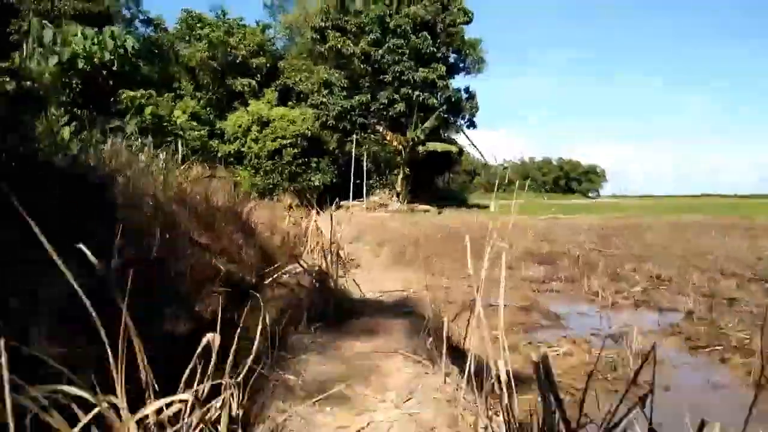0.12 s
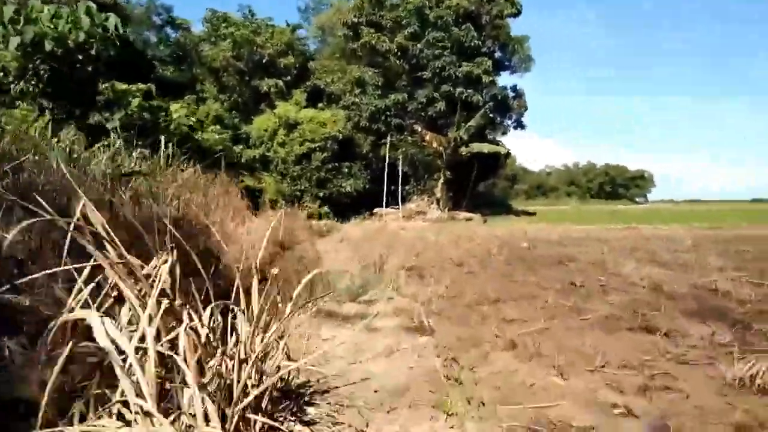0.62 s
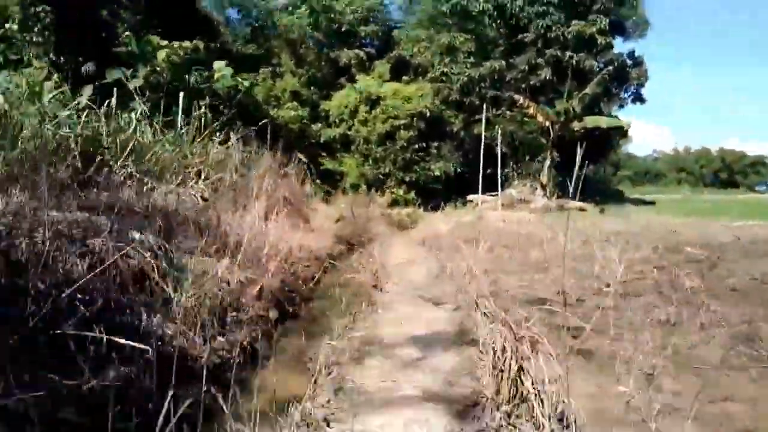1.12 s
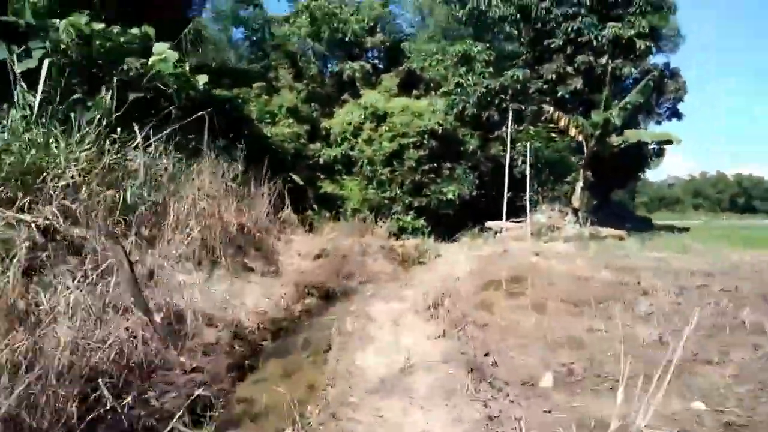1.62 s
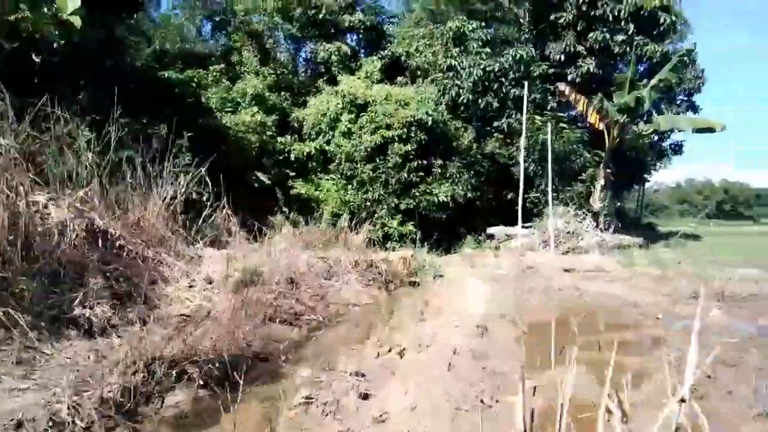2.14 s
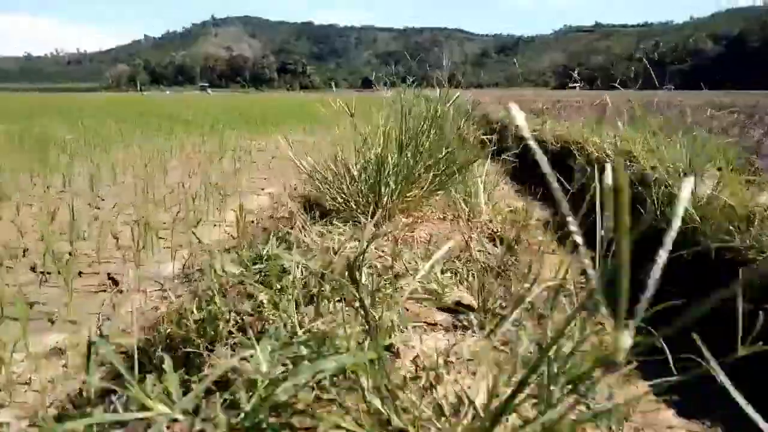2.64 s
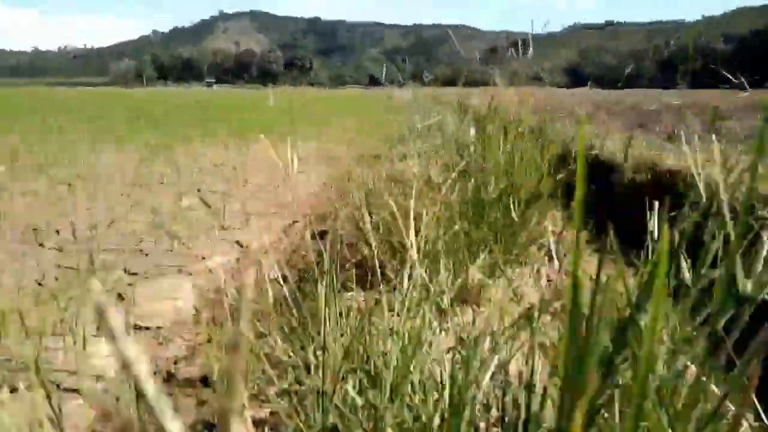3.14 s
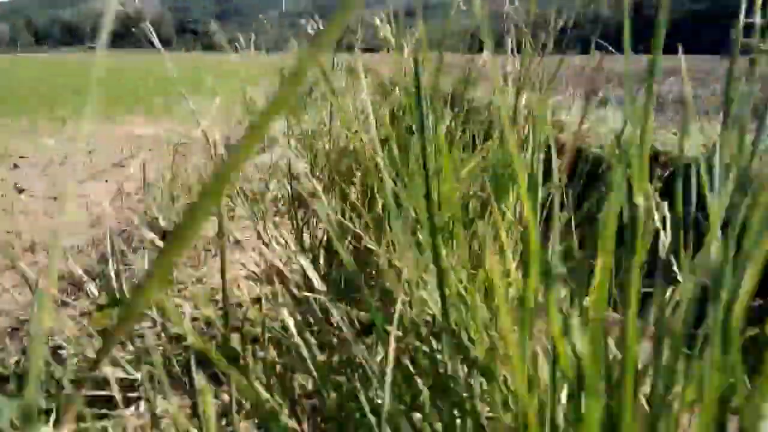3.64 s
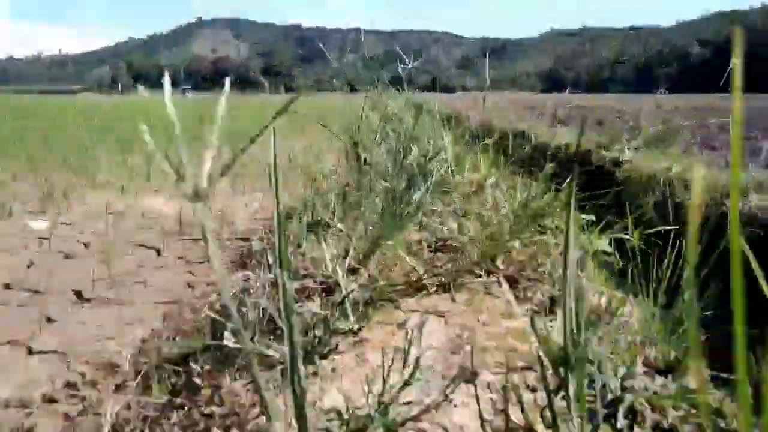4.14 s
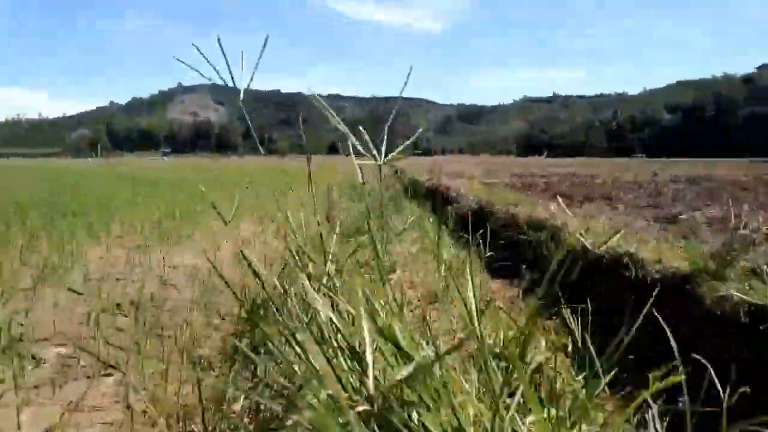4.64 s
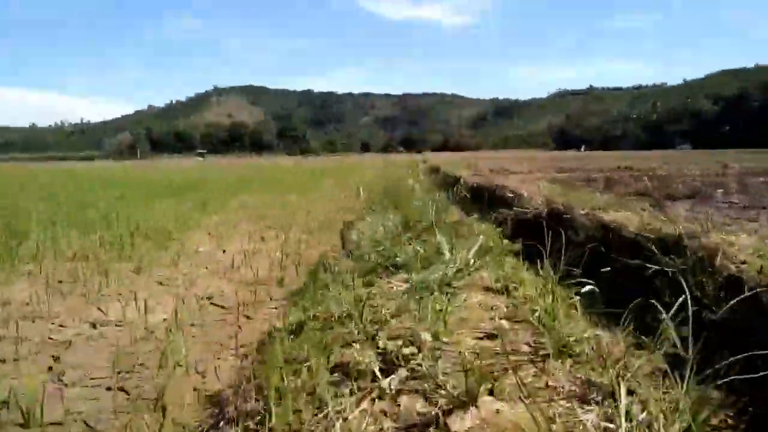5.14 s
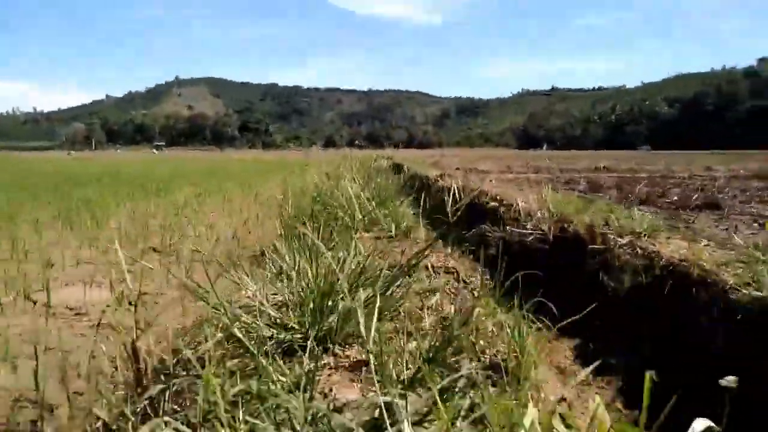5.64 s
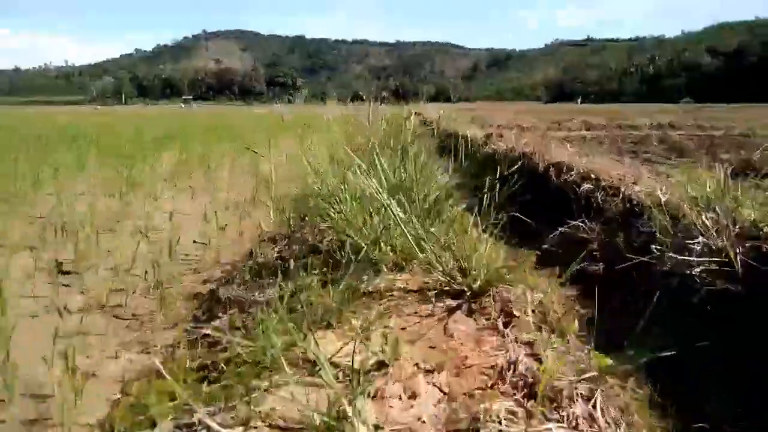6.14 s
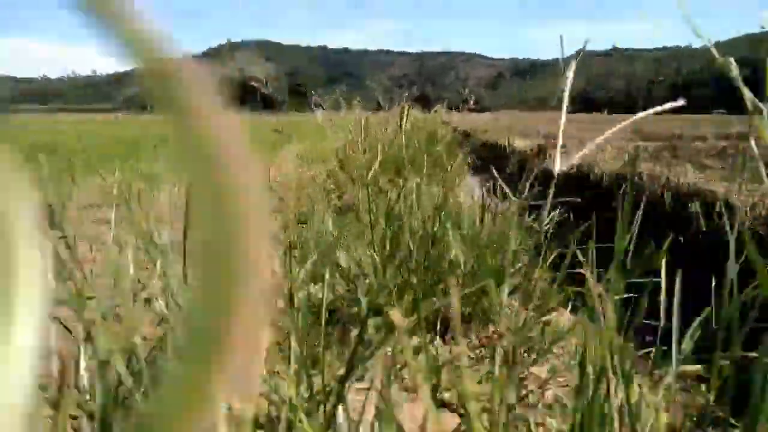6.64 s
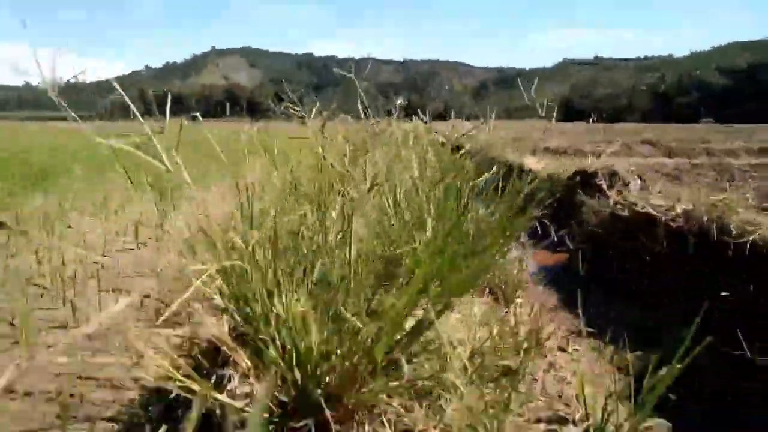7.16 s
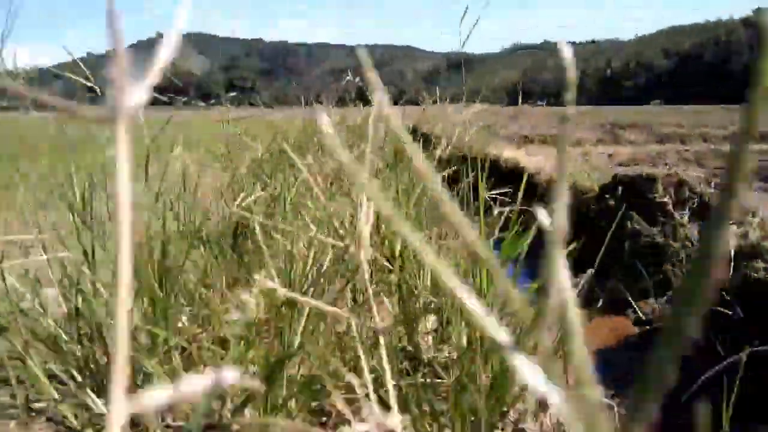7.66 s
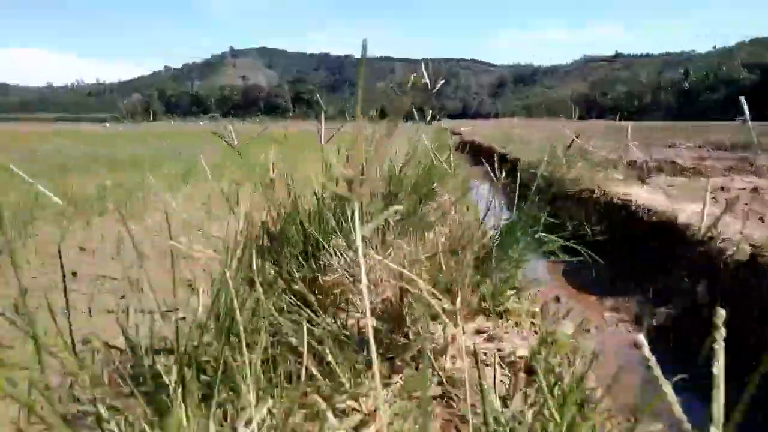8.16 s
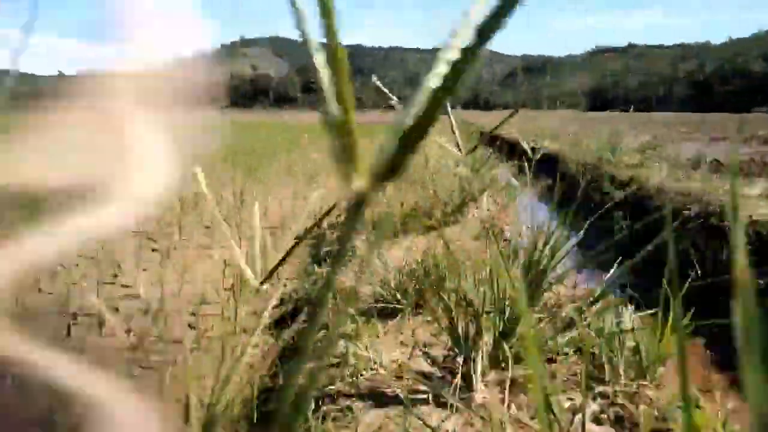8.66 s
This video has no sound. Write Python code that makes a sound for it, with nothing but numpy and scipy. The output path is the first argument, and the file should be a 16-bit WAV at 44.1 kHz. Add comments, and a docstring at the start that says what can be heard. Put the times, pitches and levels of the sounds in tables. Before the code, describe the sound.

Quick footsteps crunch dry straw and swish through grass along a dirt path, with snapping stems, faint metallic clinks and low thumps against the microphone.

```python
"""Quick steps brush and crush dry straw and grass along a dirt dike, heard from a microphone carried low.
Stems snap, squeak and slap the housing; small metal parts clink, mostly early on; a bird peeps twice.
Breaking stalks are streams of tiny noise grains, shaped by the push of each foot. Knocks, clinks, squeaks
and peeps are built from sine waves. The open field adds no echo, only a faint hush of filtered noise."""
import sys
import numpy as np
from scipy import signal
from scipy.fft import rfft, irfft, next_fast_len
from scipy.io import wavfile
from scipy.ndimage import uniform_filter1d

SR = 44100
rng = np.random.default_rng(int(sys.argv[2]) if len(sys.argv) > 2 else 0)


def gain_from_db(level_db):
    """Convert decibel levels to linear amplitude factors (20 dB per decade)."""
    decades = np.asarray(level_db, float) / 20
    return 10 ** decades


def pcm_store(signal):
    """Save signal as 16-bit PCM."""
    levels = np.round(np.clip(np.atleast_2d(signal), -1, 1) * 32767)
    wavfile.write(sys.argv[1], SR, levels.astype(np.int16).T)


N = 387192  # length in samples


def evened(x):
    """Scales a sound to an rms (average strength) of 1."""
    return x / np.sqrt(np.mean(x ** 2) + 1e-20)


def coloured(x, points):
    """Makes some pitches stronger and others weaker, following a curve of (f/Hz, gain/dB)."""
    hz, db = np.transpose(points)
    size = next_fast_len(len(x))
    bins = np.fft.rfftfreq(size, 1 / SR) + 1  # 1 Hz up, so that the logarithm never meets zero
    gain = gain_from_db(np.interp(np.log(bins), np.log(hz), db))
    return irfft(rfft(x, size) * gain, size)[:len(x)]


def gain_over_time(points):
    """Gives the gain at every sample from a curve of (t/s, level/dB)."""
    seconds, db = np.transpose(points)
    return gain_from_db(np.interp(np.arange(N) / SR, seconds, db))


def add(mix, s, sound):
    """Mixes a sound in, starting at s seconds."""
    part = mix[max(round(s * SR), 0):][:len(sound)]
    part += sound[:len(part)]


def hush():
    """The faint hush of the open field: steady noise, strongest in the low middle pitches."""
    # colour of the hush: f/Hz, gain/dB
    hush_tone = [(180, -31), (300, -1), (366, -5), (1930, -15), (3290, -20), (12300, -14), (16000, -21)]
    return gain_from_db(-83) * evened(coloured(rng.standard_normal(N), hush_tone))


def pressure(index):
    """Gain at every sample: each rustle swells to its peak and dies away, and their powers add."""
    # every press or brush of a foot through the stalks: peak t/s, rise/ms, fall/ms,
    # crunch of soil and straw level/dB, hiss of grass blades level/dB
    rustles = [(0.075, 20, 41, -57.5, -67), (0.137, 20, 57, -65.5, -65), (0.206, 5.6, 25, -54.5, -46.5),
               (0.253, 31, 32, -60.5, -59), (0.308, 7.2, 100, -52.5, -53), (0.347, 14, 36, -43, -44.5),
               (0.419, 61, 64, -53.5, -46.5), (0.492, 7.4, 49.5, -54.5, -48), (0.604, 5, 32, -50, -43.5),
               (0.685, 71, 35, -52.5, -46), (0.781, 3.9, 49, -51.5, -51), (0.915, 30.5, 13.3, -52, -50),
               (0.955, 45, 138, -48.5, -46), (1.093, 24.9, 21, -54, -54), (1.15, 5.2, 16.8, -70, -56),
               (1.232, 41, 64, -53.5, -49), (1.336, 22, 25, -49, -57), (1.378, 29.1, 17.4, -49, -40),
               (1.417, 19, 65, -62.5, -68), (1.518, 41, 18.5, -50.5, -51), (1.646, 11.4, 45, -50.5, -43.5),
               (1.774, 85, 80, -52, -49.5), (1.79, 7.2, 28, -89.6, -41.5), (1.887, 2.7, 60, -59, -63),
               (1.93, 20, 28.6, -53.5, -44), (2.048, 15.6, 22, -35, -56), (2.195, 4, 59, -55.5, -46.5),
               (2.136, 3.6, 140, -63.5, -63), (2.329, 24, 39, -46.5, -59), (2.445, 37.0, 32, -63, -57.5),
               (2.517, 66, 14, -61, -55.5), (2.699, 17.3, 20, -35.5, -56), (2.753, 45, 10, -49, -51.5),
               (2.796, 7.7, 28, -66, -58.5), (2.862, 79, 40, -72, -69), (2.958, 21, 103, -48.5, -51.5),
               (3.032, 94, 7.0, -53.5, -59), (3.296, 33.5, 70, -41.5, -56), (3.342, 35, 135, -48, -45),
               (3.444, 290, 4.8, -57.5, -53), (3.628, 66.5, 65, -39, -45), (3.757, 8.7, 100, -53, -47.5),
               (3.806, 25, 45, -40, -41), (3.844, 17, 41, -43.5, -33.5), (3.904, 36, 13, -51.5, -28.5),
               (3.969, 170, 225, -42, -35.5), (3.986, 24, 22, -38.5, -24.5), (4.062, 39, 22, -41, -28),
               (4.149, 22, 33, -40.5, -47), (4.306, 154, 40, -52.5, -50.5), (4.46, 29, 110, -69.5, -71),
               (4.541, 15, 78, -64, -65.5), (4.793, 41, 180, -53, -59.5), (4.88, 34, 67, -46.5, -50.5),
               (4.973, 97, 190, -52, -47), (5.053, 22, 6.9, -45.5, -42.5), (5.113, 56, 130, -50.5, -51.5),
               (5.185, 23, 68, -44.5, -49.5), (5.37, 41, 25.5, -57, -64.5), (5.414, 17.3, 44, -43, -50),
               (5.481, 37, 41, -49, -52), (5.567, 33, 22, -65, -57), (5.632, 63, 9.5, -61, -59),
               (5.67, 14, 98, -54, -62), (5.738, 11, 8, -65, -40.5), (5.8, 3.0, 45, -65, -62),
               (5.973, 11, 48, -39, -55), (6.088, 13.5, 47, -43.5, -30), (6.137, 690, 42, -56.5, -64),
               (6.205, 65, 157.2, -53.5, -51), (6.242, 18, 163, -43.5, -49), (6.382, 32, 25, -55.5, -55),
               (6.462, 16, 270, -61.5, -59), (6.534, 55, 123, -44.5, -57), (6.667, 2.4, 45, -50, -42.5),
               (6.739, 5.5, 4.7, -65, -39), (6.809, 60, 30, -52, -54), (6.829, 8.1, 115, -52.5, -45),
               (6.83, 5.5, 4.3, -41, -27), (6.974, 76, 13.4, -50, -52), (7.013, 32, 31, -63.5, -53.5),
               (7.102, 61, 91, -43.5, -50.5), (7.182, 12, 15, -49, -44.5), (7.293, 140, 19, -62, -60.5),
               (7.351, 19, 140, -53.5, -52), (7.416, 78, 108, -44.5, -47), (7.507, 43, 25, -53, -47),
               (7.601, 31, 33, -53, -66), (7.718, 70, 144, -43.5, -61.7), (7.755, 6.6, 19, -42, -25.5),
               (7.767, 220, 77, -73, -44.5), (7.791, 31, 4.9, -84, -33.5), (7.849, 11, 23, -48.5, -50.5),
               (7.918, 39, 26, -53, -58), (8.028, 82, 42, -49, -46.5), (8.087, 67, 121, -48.5, -45.5),
               (8.363, 76, 79, -46.5, -47), (8.454, 72, 40.5, -49, -56), (8.541, 3.2, 30, -60, -60),
               (8.595, 20, 41, -46.5, -55), (8.689, 116, 74, -43.5, -42.5), (8.742, 30, 15, -39, -50),
               (8.775, 68, 40.0, -48.5, -46)]
    flank_db, roundness = -24, 1.55  # level one rise or fall time from the peak; 1 = pointed, 2 = round
    quiet_db = -89  # faint stirring between rustles
    rows, t = np.array(rustles), np.arange(0, N / SR, .001)
    since_ms = 1000 * (t - rows[:, :1])
    rise_ms, fall_ms = abs(rows[:, 1:2]), abs(rows[:, 2:3])
    far = np.where(since_ms < 0, -since_ms / rise_ms, since_ms / fall_ms)
    power = gain_from_db(rows[:, index, None] + np.maximum(flank_db * far ** roundness, quiet_db)) ** 2
    return np.interp(np.arange(N) / SR, t, np.sqrt(power.sum(0) + gain_from_db(quiet_db) ** 2))


def crackle(per_s, spread_db, decay, clump_db, patch_db, count=28):
    """Countless fibres break: short grains of many pitches, a few large, in brief clumps.
    Each stalk lends a passing colour to grains of nearby pitch."""
    clumps = np.clip(evened(uniform_filter1d(rng.standard_normal(N), 200)), -2, 2)
    patches = rng.standard_normal((N // 256 + 1, count))
    patches = uniform_filter1d(patches, size=7, axis=0)  # neighbours in time
    patches = evened(uniform_filter1d(patches, size=3, axis=1))  # neighbours in pitch
    kind = rng.integers(0, count, N)
    size_db = spread_db * np.minimum(rng.exponential(1, N), 4) + clump_db * clumps
    size_db = size_db + patch_db * patches[np.arange(N) // 256, kind]
    size = gain_from_db(size_db) * (rng.random(N) < per_s / SR)
    t, out = np.arange(768) / SR, np.zeros(N)
    for k, hz in enumerate(np.geomspace(2850, 18500, count) - 2500):
        width = hz + 2500  # higher grains die away faster
        grain = np.exp(-t * width / decay) * np.cos(2 * np.pi * hz * t)
        grain = np.sqrt(width) * grain / np.linalg.norm(grain)
        out += signal.oaconvolve(size * (kind == k), grain)[:N]
    return evened(out)


def pops(per_s, spread_db):
    """Sparse sharp breaks of thin stems that stand out of the crackle: brief dying noise."""
    size = gain_from_db(spread_db * np.minimum(rng.exponential(1, N), 3)) * (rng.random(N) < per_s / SR)
    burst = rng.standard_normal(64) * np.exp(-np.arange(64) / 12)
    return signal.oaconvolve(size, burst)[:N]


def steps():
    """One stream of breaking fibres over a smooth swish feeds both the dull crunch and the bright hiss."""
    # colour of crushed soil and straw: f/Hz, gain/dB
    crunch_tone = [(250, -16.5), (500, -12.5), (1000, -13.5), (1900, -11), (3200, -14.5), (5000, -21),
                   (8000, -29)]
    # colour of brushed grass blades: f/Hz, gain/dB
    hiss_tone = [(3500, -17), (6000, -2), (7800, 4), (10800, 9.5), (12800, 6.5), (15300, 0.5),
                 (16300, -43.5)]
    fibres = crackle(14000, spread_db=3, decay=9, clump_db=3, patch_db=4.5)
    swish = .28 * rng.standard_normal(N)
    fibres = fibres + swish + 1.7 * pops(140, spread_db=3.6)
    crunch = pressure(index=3) * evened(coloured(fibres, crunch_tone))
    hiss = pressure(index=4) * evened(coloured(fibres, hiss_tone))
    return crunch + hiss


def thumps():
    """A pull, a push and a short wobble of air; under them a rumble that swells with each crunch."""
    # air and handling at the microphone, before the swell: t/s, level/dB
    rumble_level = [(0.0, -62), (3.64, -73.5), (3.99, -60), (4.5, -78), (4.89, -71.5), (8.48, -70),
                    (8.78, -64)]
    # colour of the rumble: f/Hz, gain/dB
    rumble_tone = [(25, -51), (45, 1), (80, -1.5), (130, -2), (250, -4), (450, -9), (900, -40)]
    # tufts that slap the microphone and push air at it, before drive and wobble:
    # middle t/s, level/dB, f/Hz, length at half height/ms (the second half is made slightly shorter)
    slaps = [(3.342, -42, 102, 7.8), (3.367, -42.5, 100, 6), (3.399, -45, 105, 4.9),
             (3.432, -46.5, 102, 8.2), (3.629, -35, 225, 8.2), (3.813, -31, 94, 6.4),
             (3.995, -22.5, 123, 5), (4.053, -20.5, 124, 2.4), (4.155, -17.5, 125.4, 4.2),
             (6.128, -15, 160, 2.36), (6.753, -25.5, 157, 2.2), (6.811, -32.5, 130, 4.9),
             (6.87, -39, 102, 7.9), (6.953, -36.5, 113, 4.4), (7.7362, -24, 116, 17), (7.76, -12, 156, 3),
             (8.026, -31.5, 98, 5.5), (8.076, -34, 92.5, 13), (8.313, -37.5, 79, 9.5),
             (8.412, -40.5, 109, 9.3), (8.6998, -19, 129, 3.9), (8.726, -23.5, 102, 11),
             (8.742, -18.5, 123, 2.4)]
    swell = uniform_filter1d(pressure(index=3), 900) / gain_from_db(-67.0)
    rumble = evened(coloured(rng.standard_normal(N), rumble_tone))
    out = gain_over_time(rumble_level) * swell ** 0.52 * rumble
    t = np.arange(-2048, 2048) / SR
    for s, db, hz, ms in slaps:
        push = np.sin(2 * np.pi * hz * t)
        edge = np.tanh(1.39 * push) / np.tanh(2.2)  # the diaphragm is driven hard: a steeper flank
        length_ms = np.where(t > 0, 0.99 * ms, ms)
        bell = np.exp(-np.log(2) * (2000 * t / length_ms) ** 2)
        add(out, s + t[0], gain_from_db(db) * bell * edge)
    # the microphone sheds deep bass and swings on a little after each push
    wobble_hz, wobble_q = 79, 1.33
    w = 2 * np.pi * wobble_hz
    return signal.lfilter(*signal.bilinear([1, 0, 0], [1, w / wobble_q, w ** 2], SR), out)


def clinks():
    """Small metal parts knock together: each blow rings one mode strongly and the others faintly."""
    # blows: t/s, level before the soft start/dB, mode that the blow favours f/Hz
    blows = [(0.204, -33.5, 11890), (0.3, -38, 14400), (0.346, -33, 11500), (0.365, -27, 14660),
             (0.783, -22, 14660), (0.79, -33.5, 11890), (1.219, -33, 9500), (1.246, -30, 14660),
             (1.248, -40.5, 7300), (1.363, -43, 9500), (1.51, -33, 11890), (1.515, -29.5, 9500),
             (1.642, -24, 11890), (1.711, -33, 14660), (1.773, -35.5, 14660), (1.783, -21.5, 9500),
             (2.196, -38, 9500), (2.704, -32, 9500), (6.379, -29, 14660)]
    # ringing modes of the metal: f/Hz, time to die away by 60 dB t60/s
    metal = [(7300, 0.048), (9500, 0.032), (11500, 0.053), (11890, 0.04), (14400, 0.058), (14660, 0.033)]
    out, t = np.zeros(N), np.arange(4096) / SR
    hz, t60 = np.transpose(metal)
    faint_db = -30 + 6 * rng.standard_normal((len(blows), len(hz)))
    for (s, db, favoured_hz), share_db in zip(blows, faint_db):
        favoured = np.argmin(abs(hz - favoured_hz))
        share_db = np.where(np.arange(len(hz)) == favoured, 0, share_db)
        fade = gain_from_db(share_db[:, None] - 60 * t / t60[:, None])
        modes = fade * np.sin(2 * np.pi * hz[:, None] * t)
        add(out, s, gain_from_db(db) * modes.sum(0) * np.minimum(t / 0.0046, 1))  # 4.6 ms soft start
    return out


def ring(modes, detune, rise_s):
    """Dying sine waves after one soft-edged blow."""
    t, out = np.arange(1024) / SR, 0
    for (hz, db, t60), d in zip(modes, detune):
        out = out + gain_from_db(db - 60 * t / t60) * np.sin(2 * np.pi * hz * d * t)
    return out * np.minimum(t / rise_s, 1)


def snaps():
    """A thin bright tick that splinters briefly and a woody knock at the pitch of each stem."""
    # stems that snap or flick the housing: t/s, tick peak level/dB, knock peak level/dB, knock f/Hz
    stems = [(0.3503, -41, -25, 1800), (0.4197, -24, -31.5, 2500), (0.493, -44, -42, 1370),
             (0.9129, -45, -29, 2650), (1.672, -50, -36.5, 1540), (1.734, -55, -33, 2470),
             (2.0502, -43, -23, 1200), (2.0684, -44, -35, 3320), (2.3482, -49, -26.5, 1760),
             (2.6936, -47, -38, 2160), (3.3707, -21, -43, 2330), (3.6262, -18.5, -24.5, 3480),
             (3.7893, -23.5, -35, 3130), (3.7999, -30, -32, 2230), (3.8046, -33.5, -24, 1200),
             (3.821, -31, -29, 2890), (3.8437, -18, -30, 2550), (3.8533, -21, -38, 2720),
             (3.9, -14, -44, 3050), (3.9024, -13, -39, 3280), (3.9184, -23, -29, 1410),
             (3.9256, -28, -18.5, 3520), (3.9538, -12.5, -21, 2180), (3.9811, -11, -34, 2110),
             (3.998, -8, -16.5, 2400), (4.0048, -14.5, -44, 2000), (4.034, -18, -33, 2370),
             (4.055, -14, -35, 1680), (4.0614, -1.5, -25, 1530), (4.0634, -8, -32, 2340),
             (4.0709, -12.5, -32, 1380), (4.1043, -24, -47, 2600), (4.1523, -27.5, -25, 2740),
             (4.2737, -28, -27.5, 1320), (4.2931, -27.5, -54, 2550), (4.3021, -49.5, -27.5, 1360),
             (4.394, -38, -45, 1590), (4.8754, -14.5, -42, 3260), (5.0035, -26, -35, 3460),
             (5.48, -44, -27, 1740), (5.4932, -33, -33, 1720), (5.8028, -35, -44, 2620),
             (6.0888, -24, -30.5, 3840), (6.0958, -25, -23.5, 1830), (6.6698, -30, -32.5, 2520),
             (6.7518, -17.5, -26, 1950), (6.806, -19, -40, 2130), (6.83, -17, -35, 2440),
             (6.8342, -13, -40, 2490), (6.8598, -21.5, -41, 2700), (6.9235, -25.5, -51, 2190),
             (6.9603, -25.5, -29, 1410), (7.0556, -30, -42, 4600), (7.5962, -21.5, -49, 1590),
             (7.7264, -19, -42, 3050), (7.7607, -18, -19, 1000), (7.8179, -10, -27.5, 1870),
             (7.8255, -24, -39, 2300), (8.0236, -25, -26.5, 2550), (8.09, -18.5, -30, 2640),
             (8.102, -23, -37, 2260), (8.106, -19.5, -38, 2070), (8.1506, -28, -29, 2450),
             (8.5869, -14, -20, 2500), (8.5932, -20.5, -32, 2510), (8.598, -22.5, -26, 2350),
             (8.599, -20, -15.5, 2370), (8.6035, -32, -27, 2090), (8.6871, -23, -18.5, 2600),
             (8.743, -36, -16.5, 1150)]
    # modes of the tick, before detuning and splintering: f/Hz, level/dB, t60/s
    tick_modes = [(10600, 0, .002), (13500, -7, .0015), (7800, -6, .002)]
    # modes of the knock, the last two rows then detuned: multiple of the knock pitch, level/dB, t60/s
    knock_modes = [(1, 2, 0.0025), (.55, -14, .004), (1.6, -8, 0.0022)]
    out, detune = np.zeros(N), rng.uniform(0.865, 1.1, (len(stems), 3))
    splinters = rng.standard_normal((len(stems), 80)) * np.exp(-np.arange(80) / 5)
    for (s, tick_db, knock_db, knock_hz), d, splinter in zip(stems, detune, splinters):
        tick = np.convolve(ring(tick_modes, d, .0001), splinter)
        tick = np.diff(tick, 2, prepend=0)[:1024]  # differences thin out the low pitches
        knock = ring(knock_modes, knock_hz * d / d[0], .0002)
        tick = gain_from_db(tick_db) * tick / abs(tick).max()
        knock = gain_from_db(knock_db) * knock / abs(knock).max()
        add(out, s - .0003, tick + knock)
    return out


def squeaks():
    """A narrow tone that stutters and wavers as the stalk slips."""
    # stalks that rub and squeak: middle t/s, length between the points 12 dB down/ms,
    # f before the waver/Hz, level before the stutter/dB
    rubs = [(1.369, 28, 4530, -48), (1.37, 12, 5370, -38.5), (1.768, 26, 2410, -50.5),
            (4.06, 10.3, 7430, -32.5), (4.995, 20, 5380, -47), (5.02, 14, 6560, -48), (5.05, 20, 6600, -55)]
    out, t = np.zeros(N), np.arange(-1024, 1024) / SR
    for (s, ms, hz, db), chance in zip(rubs, rng.standard_normal((len(rubs), 2, 2048))):
        stutter, waver = evened(uniform_filter1d(uniform_filter1d(chance, size=90), size=90))
        tone = np.sin(2 * np.pi * np.cumsum(hz * (1 + .015 * waver)) / SR)
        fade_db = -12 * (2000 * t / ms) ** 4
        add(out, s + t[0], gain_from_db(db + 4 * stutter + fade_db) * tone)
    return out


def bird():
    """An arched whistle with its octave: every peep climbs, swells and drops away."""
    # peeps: start t/s, length/s, pitch near the top f/Hz, rms level before the arch/dB, depth of the arch
    peeps = [(6.474, 0.041, 4440, -40, 1.0), (6.55, 0.047, 4285, -36, 0.53)]
    # course of a peep at full depth: share of length, share of top pitch, level/dB, octave level/dB
    arch = [(0, .8, -28, -18), (.22, .935, -11, -13.5), (.5, 0.97, -3.5, -16), (.7, 1, -1.5, -16),
            (.85, .94, -2, -22), (1, 0.71, -12, -40)]
    shallow_fade_db = -16  # a shallower peep fades sooner once past its top
    out = np.zeros(N)
    share, *columns = np.transpose(arch)
    for s, length, top_hz, peak_db, depth in peeps:
        done = np.arange(0, length, 1 / SR) / length
        pitch, db, octave_db = (np.interp(done, share, c) for c in columns)
        pitch = 1 - depth * (1 - uniform_filter1d(pitch, size=200, mode="nearest"))
        db = db + shallow_fade_db * (1 - depth) * np.clip((done - .7) / .3, 0, 1)
        turn = 2 * np.pi * np.cumsum(top_hz * pitch) / SR
        whistle = gain_from_db(db) * np.sin(turn) + gain_from_db(octave_db) * np.sin(2 * turn)
        add(out, s, np.sqrt(2) * gain_from_db(peak_db) * whistle)
    return out


def scene():
    """All sources sound alike in both channels."""
    mid = hush() + steps() + thumps() + clinks() + snaps() + squeaks() + bird()
    return np.array([mid, mid])


def treble_difference(mid):
    """A fluttering treble difference between left and right, in patches of pitch and time."""
    # how far the difference lies below the middle: f/Hz, gain/dB
    side_tone = [(3650, -70), (3900, -10), (7000, -12), (16000, -13)]
    patch_share = .48  # chance that a patch is kept
    flutter = evened(uniform_filter1d(uniform_filter1d(rng.standard_normal(N), 40), 40))
    smear = evened(rng.standard_normal(128)) / np.sqrt(128)
    smeared = signal.oaconvolve(mid, smear, "same") * flutter
    z = signal.stft(smeared, nperseg=512)[2]  # a grid of pitch by time
    on = rng.random((z.shape[0] // 14 + 1, z.shape[1] // 5 + 1)) < patch_share
    on = on.repeat(14, axis=0).repeat(5, axis=1)[:z.shape[0], :z.shape[1]]
    patchy = signal.istft(z * on / np.sqrt(patch_share), nperseg=512)[1][:N]
    return coloured(patchy, side_tone)


def top_cut(x):
    """Nothing passes above the cut-off."""
    return signal.sosfilt(signal.butter(12, 16650, fs=SR, output="sos"), x)


def record(dry):
    """The preamplifier softly rounds off loud peaks; deep bass and top treble are cut; left and right differ."""
    # overall band, deep bass eased off and treble cut near 16 kHz: f/Hz, gain/dB
    overall_band = [(18, -14), (45, 0), (15700, 0), (16400, -12), (16800, -70)]
    ceiling = .6  # peaks are rounded off near this sample value
    mid = coloured(ceiling * np.tanh(dry[0] / ceiling), overall_band)
    side = treble_difference(mid)
    return top_cut(np.array([mid + side, mid - side]))


dry = scene()
out = record(dry)
pcm_store(out)
```